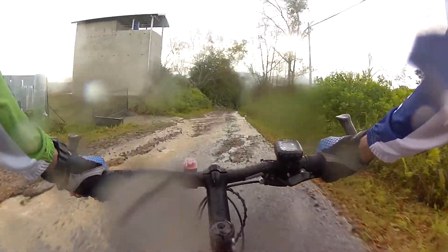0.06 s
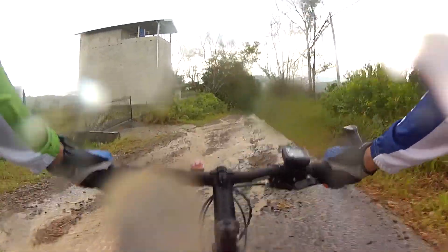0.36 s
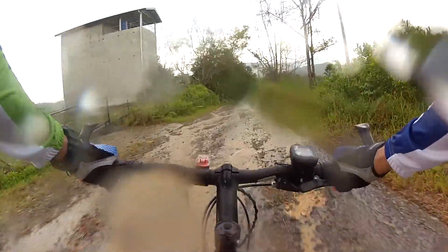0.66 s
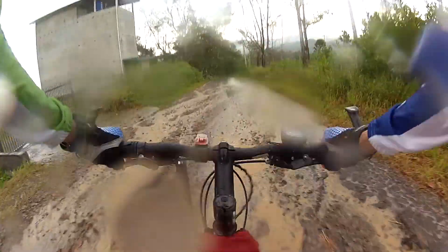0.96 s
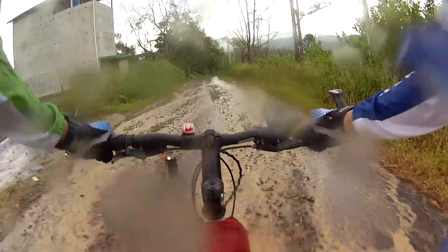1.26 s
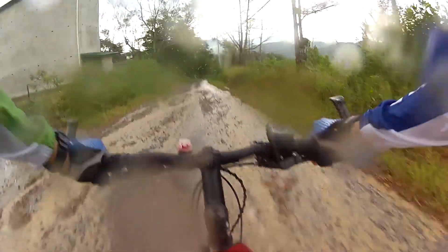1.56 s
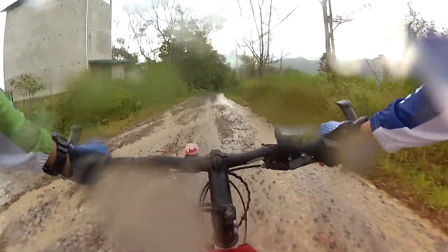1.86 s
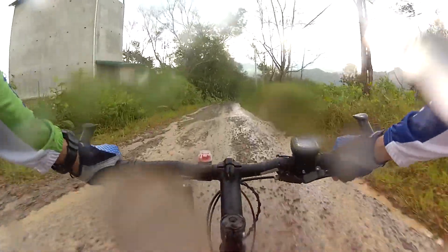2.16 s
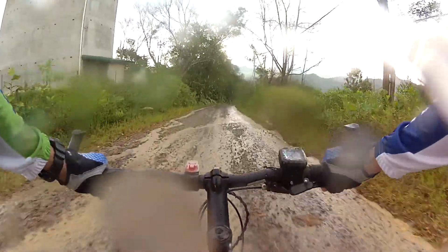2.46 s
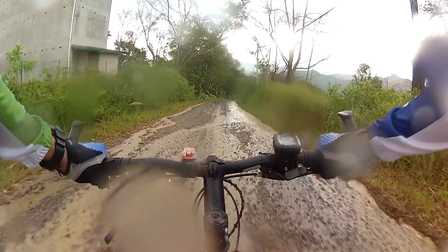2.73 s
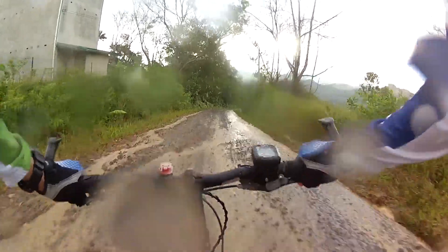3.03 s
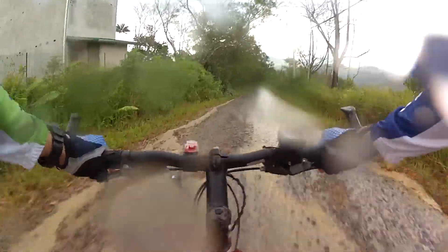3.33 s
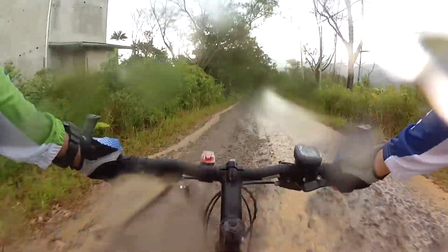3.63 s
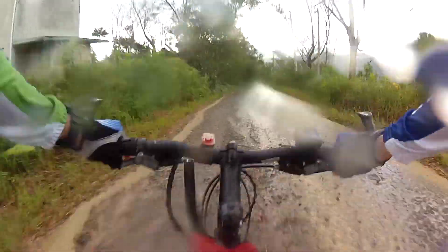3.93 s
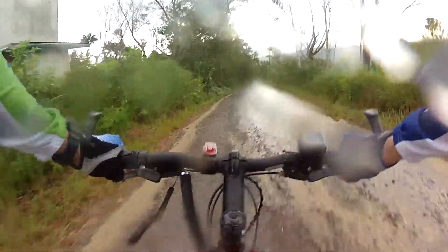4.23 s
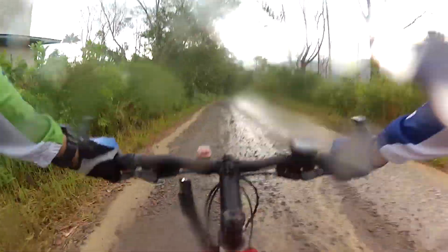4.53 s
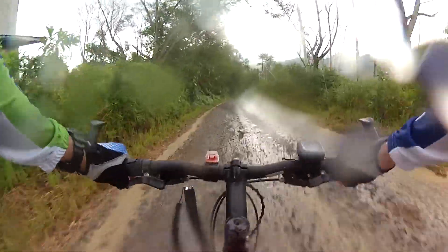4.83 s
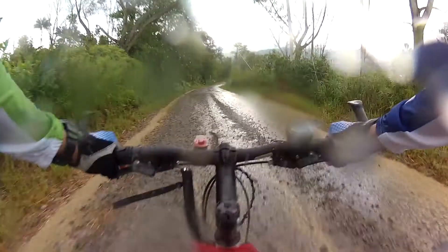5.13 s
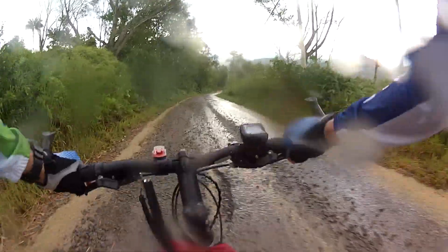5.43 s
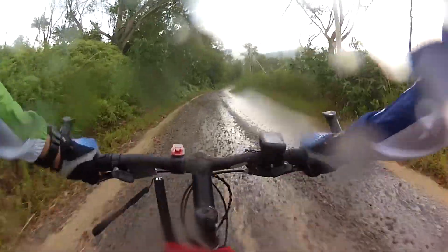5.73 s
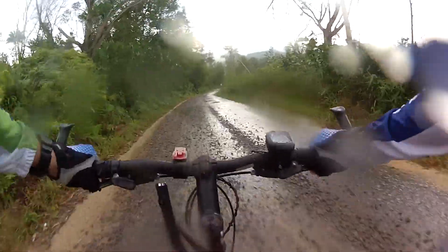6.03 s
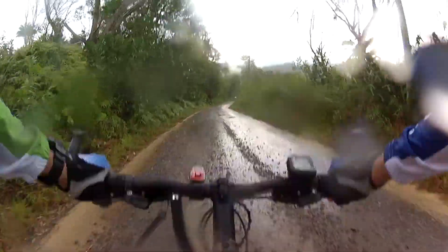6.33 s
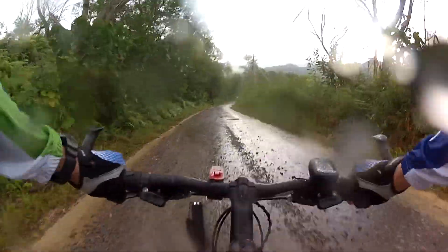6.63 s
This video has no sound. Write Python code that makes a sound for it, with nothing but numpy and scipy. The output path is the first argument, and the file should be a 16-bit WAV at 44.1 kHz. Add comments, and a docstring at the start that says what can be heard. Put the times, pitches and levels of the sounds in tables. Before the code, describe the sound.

Bicycle tyres roll along a wet, broken road for nearly seven seconds, heard close from a microphone in a plastic case on the rider's chest. A gritty spray hiss runs over an uneven low rumble, while mud drops and small stones tick irregularly on the case. The spray swells around 1 second, and a run of heavy thuds follows from about 1.3 to 1.8 seconds. At 1.6 seconds a splash and one hard jolt, the loudest moment, overload the microphone and briefly duck the sound. The rolling is quieter between 2 and 2.7 seconds. Splashes and a bump return around 3 seconds, with a flurry of clicks from 3.7 to 4. Another strong thud with splashing comes at 5 seconds, and a smaller one near 6.5. A very faint high whine flutters with the bass.

```python
"""Tyres hiss and throw grit over a low rumble: a bicycle rolling down a wet, broken road,
heard from a camera in a plastic case on the rider's chest. Mud drops and small stones tick
on the case, whose resonances colour both spray and hits, and the hiss swells at each puddle.
Bumps thud through the mount, and one hard jolt overloads the microphone and ducks the sound
for a moment. The recorder adds a faint 12 kHz whine that flutters with the bass."""
import sys
import numpy as np
from scipy import signal
from scipy.fft import rfft, irfft
from scipy.io import wavfile
from scipy.ndimage import uniform_filter1d

SR = 44100
rng = np.random.default_rng(int(sys.argv[2]) if len(sys.argv) > 2 else 0)


def generate_wav(sig):
    """Save sig (samples, or channels by samples) to the path in sys.argv[1] as 16-bit PCM at SR."""
    pcm = np.round(np.clip(np.atleast_2d(sig).T, -1, 1) * 32767).astype(np.int16)
    wavfile.write(sys.argv[1], SR, pcm)


N = 294588
TIME = np.arange(N) / SR

# Water thrown by the tyres, more with speed and wetness. Each row: time in seconds, relative level in dB.
WETNESS_CURVE = [(0.0, -54), (0.52, -54), (1.21, -45), (1.47, -40), (1.71, -46.5), (2.36, -53.5),
                 (2.75, -50.5), (2.9, -48.5), (3.18, -46.5), (3.44, -50.5), (3.64, -49.5), (3.93, -44.5),
                 (4.04, -49.5), (4.3, -49.5), (5.06, -44), (5.19, -50), (6.25, -48.5), (6.68, -46)]
# Resonances of the case and the dips between them. Each row: centre in Hz, width in Hz, gain in dB.
CASE_MODES = [(1168, 356, 5.5), (1518, 330, -7.5), (1828, 400, 9.5), (2530, 360, 10.5), (3087, 260, -6.5),
              (3410, 84, 8.5), (3836, 167, 8.5), (4844, 210, 7), (6025, 530, -23), (7110, 120, 6),
              (8256, 165, 10), (8770, 150, 14.5), (8940, 520, -11), (9430, 380, 12), (10120, 550, 8.5),
              (11800, 840, -23.5), (14570, 670, 6.5), (14380, 280, 10)]
# Tone of a hard strike, before the case colours it. Each row: frequency in Hz, gain in dB.
STRIKE_EQ = [(100, -1), (550, -16), (1000, 2.5), (1800, 3), (3200, -3), (4500, -9), (7000, -11.5),
             (10500, -9), (14500, -13.5), (16000, -29)]
# Tone of a soft, dull blow. Each row: frequency in Hz, gain in dB.
THUMP_EQ = [(60, -4), (350, -7.5), (600, -18.5), (1000, -4), (1400, -10), (2500, -23), (8000, -34.5)]


def amp(db):
    """Decibels to gain."""
    return 10 ** (np.asarray(db) / 20)


def unit_rms(x):
    """Scales to rms 1."""
    return x / np.sqrt(np.mean(x ** 2) + 1e-20)


def unit_energy(x):
    """Scales to energy 1."""
    return x / np.linalg.norm(x)


def fader(curve):
    """A dB curve as a gain for every sample."""
    return amp(np.interp(TIME, *np.transpose(curve)))


def add(mix, start_s, sound):
    """Mixes a sound in at a time."""
    part = mix[max(round(start_s * SR), 0):][:len(sound)]
    part += sound[:len(part)]


def response(eq, modes=(), size=4096):
    """Minimum-phase impulse response of an EQ curve with resonances on it."""
    hz = abs(np.fft.fftfreq(size, 1 / SR))
    points_hz, gains_db = np.transpose(eq)
    db = np.interp(np.log(hz + 1), np.log(points_hz), gains_db)
    for centre, width, height in modes:
        db += height / (1 + (2 * (hz - centre) / width) ** 2)
    log_spectrum = np.conj(signal.hilbert(np.log(amp(db))))
    return np.fft.ifft(np.exp(log_spectrum)).real[:size // 2]


def colour(x, eq, modes=()):
    """Plays a signal through an EQ curve and its resonances."""
    return signal.oaconvolve(x, response(eq, modes))[:len(x)]


def wander(rate_hz):
    """Random flutter of rms 1, faster than 5 Hz and rolling off above the given rate."""
    hz = np.fft.rfftfreq(N, 1 / SR)
    spectrum = rfft(rng.standard_normal(N)) * (hz > 5) / (1 + (hz / rate_hz) ** 2)
    return unit_rms(irfft(spectrum, N))


def grains(per_s, spread_db):
    """Random impacts of either sign: most are tiny, a few large."""
    sizes = amp(spread_db * np.minimum(rng.exponential(1, N), 4.5))
    signs = rng.choice([-1, 1], N)
    return unit_rms(sizes * signs * (rng.random(N) < per_s / SR))


def spatter(per_s, spread_db, swell_s):
    """Clumps of droplets: short bursts of noise at random moments."""
    t = np.arange(SR // 20) / SR
    bursts = signal.oaconvolve(abs(grains(per_s, spread_db)), t * np.exp(-t / swell_s))[:N]
    return unit_rms(bursts * rng.standard_normal(N))


def spurts(x, depth_db, patch_size=(5, 9)):
    """Every spurt of water has its own colour: short random patches in frequency and time."""
    frames = dict(nperseg=512, noverlap=384)
    spectra = signal.stft(x, **frames)[2]
    patches = rng.standard_normal(spectra.shape)
    for axis in (0, 1, 0, 1):
        patches = uniform_filter1d(patches, patch_size[axis], axis)
    spectra *= amp(depth_db * unit_rms(patches))
    return unit_rms(signal.istft(spectra, **frames)[1][:N])


def tyres(surge_db=0.7, drift_db=2.5):
    """Tread squeezes water into a surging hiss with grit, mud and fine mist, thickest at puddles."""
    # Tone of the spray, before the case colours it. Each row: frequency in Hz, gain in dB.
    spray_eq = [(100, -28.5), (300, 3), (420, -8.5), (700, -12), (1300, -2.5), (2200, -1), (4000, -6),
                (7000, -9), (10000, -14), (11000, -18), (15000, -17.5), (16000, -59)]
    # Airy tone of the mist. Each row: frequency in Hz, gain in dB.
    mist_eq = [(1500, -51), (3500, 12.5), (5000, 2.5), (7500, 3), (9500, -16), (12000, -82), (16000, -59)]
    hiss = amp(-1 + surge_db * wander(rate_hz=89)) * rng.standard_normal(N)
    grit = amp(-7) * grains(per_s=700, spread_db=6.5)
    mud = amp(-3.5) * spatter(per_s=55, spread_db=3.0, swell_s=0.0012)
    spray = amp(1.5) * spurts(colour(hiss + grit + mud, spray_eq, CASE_MODES), depth_db=2.0)
    fizz = rng.standard_normal(N)
    puffs = amp(17.5) * spatter(per_s=90, spread_db=7.5, swell_s=0.0021)
    mist = spurts(colour(fizz + puffs, mist_eq), depth_db=1.5)
    mist *= amp(drift_db * wander(rate_hz=6.8))
    road, sheets = fader(WETNESS_CURVE), puddles()
    return spray * np.hypot(road, sheets) + mist * np.hypot(amp(-15.5) * road, amp(-10.5) * sheets)


def mount(lumps_db=2.5, rise_s=0.0027, judder_s=0.031, sag_s=0.014):
    """The camera sways on its mount in a lumpy rumble; each bump adds a swing, a sag and a judder."""
    # The road shaking the mount. Each row: time in seconds, relative level in dB.
    shaking = [(0.0, -46.5), (1.19, -43.5), (1.49, -45.5), (1.6, -26), (1.78, -44), (2.29, -51.5),
               (3.33, -46), (4.86, -43.5), (6.31, -47), (6.68, -42)]
    # Bumps in the road. Each row: crest in seconds, level in dB, mount pitch in Hz, decay in seconds.
    bumps = [(0.927, -28.5, 102, 0.027), (1.25, -23, 116, 0.0066), (1.308, -21.5, 90.5, 0.014),
             (1.333, -15.5, 99, 0.02), (1.352, -9, 96, 0.0096), (1.445, -11.5, 109, 0.0066),
             (1.491, -13.5, 170, 0.0083), (1.519, -17.5, 113, 0.01), (1.578, -17.5, 94, 0.01),
             (1.667, -9, 115, 0.018), (1.765, -21.5, 108, 0.025), (3.158, -15, 86, 0.0059),
             (3.513, -23, 78, 0.014), (3.882, -25.5, 118.6, 0.023), (4.323, -24.5, 116, 0.018),
             (4.355, -24, 111, 0.043), (4.848, -22.5, 83, 0.0076), (4.959, -26.5, 110, 0.011),
             (4.985, -8.5, 109, 0.0097), (5.003, -13, 90, 0.017), (5.342, -28, 93, 0.014),
             (5.725, -22, 85.5, 0.0083), (6.455, -15.5, 88.5, 0.013), (6.601, -20, 84, 0.012)]
    thuds, judder = np.zeros(N), np.zeros(N)
    t = np.arange(-SR // 8, SR // 4) / SR
    for crest_s, db, hz, decay_s in bumps:
        # The envelope is down to a third at rise_s before the crest and decay_s after it.
        swing = -np.cos(2 * np.pi * hz * t) / np.cosh(1.75 * t / np.where(t < 0, rise_s, decay_s))
        sag = amp(-22) * (t / sag_s - 1) * np.exp(-(t / sag_s - 1) ** 2)
        add(thuds, crest_s + t[0], amp(db) * (swing + sag))
        add(judder, crest_s + t[0], amp(db - 23.5) * np.exp(-(t / judder_s) ** 2))
    # Deep tone of the swaying mount. Each row: frequency in Hz, gain in dB.
    rumble_eq = [(10, -0.5), (25, 5), (60, -5), (110, 3.5), (170, -4), (230, -9.5), (320, -15.5),
                 (500, -22.5), (1000, -27.5), (3000, -106)]
    rumble = colour(rng.standard_normal(N), rumble_eq)
    rumble = unit_rms(rumble * amp(lumps_db * wander(rate_hz=5.7)))
    return thuds + rumble * np.hypot(amp(3.5) * fader(shaking), judder)


def recorder_whine(bass, pitch_hz=12000):
    """The recorder images the bass high in the treble: a faint whine that flutters with it."""
    return amp(-33.5) * bass * np.sin(2 * np.pi * pitch_hz * TIME)


def contact(splash_db, rebound=0.5, rebound_s=0.003, swell_s=0.0015, splash_s=0.0094, size=2048):
    """A blow and three rebounds, with a brief noise swell softening the attack and a splashy tail."""
    t = (np.arange(size) - size // 2) / SR
    noise = rng.standard_normal(size) * np.exp(-abs(t) / np.where(t < 0, swell_s, splash_s))
    force = amp(splash_db) * unit_energy(noise)
    force[size // 2] += 1
    for delay, strength in rng.uniform(0.24, 1, (3, 2)):
        add(force, delay * rebound_s - t[0], np.array([rebound * strength]))
    return t[0], force


def hit(time_s, db, hardness, splash_db, ring_hz, thump_below=0.3, blend=0.03, lag_s=0.001):
    """Hard grit cracks on the case, soft mud thumps; each spot that is hit rings at its own pitch."""
    offset_s, force = contact(splash_db)
    spot = (ring_hz, 320, 7.0)
    # A harder hit has more treble snap and less body.
    snap = (6330, 9000, 35 * (hardness - 0.57))
    body = (900, 810, 6 * (0.42 - hardness))
    presence = (3190, 290, 6.2)
    crack = amp(13) * unit_energy(colour(force, STRIKE_EQ, CASE_MODES + [spot, snap, body, presence]))
    thump = amp(17) * unit_energy(colour(force, THUMP_EQ, [spot]))
    softness = 0.5 + 0.5 * np.tanh((thump_below - hardness) / blend)
    return time_s + lag_s + offset_s, amp(db) * ((1 - softness) * crack + softness * thump)


def drops_and_stones(small_per_s=6, softest=0.3, low_hz=1160, high_hz=2560, usual_wet_db=-48):
    """Drops and stones tick on the case: big ones, and a small scatter that grows with the spray."""
    # The loudest hits. Each row: time in seconds, relative strength in dB, hardness from 0 (mud)
    # to 1 (sharp grit), splash against the blow in dB, ring of the spot in Hz.
    big_hits = [(0.125, -16, 0.92, -27, 2170), (0.196, -23.5, 0.67, 7, 2100), (0.461, -21, 0.65, -5, 1110),
                (0.688, -25.5, 0.33, 4, 1160), (0.697, -21, 0.3, -2, 1170), (0.728, -15.5, 0.43, -7, 1600),
                (0.886, -24, 0.31, -2, 1780), (0.936, -21, 0.53, -6, 1950), (1.013, -22, 0.98, -1, 2650),
                (1.044, -21.5, 0.54, -9, 1930), (1.049, -16.5, 0.35, -12, 2720),
                (1.07, -17.5, 0.99, -23, 2560), (1.123, -17, 0.32, -22, 1630),
                (1.149, -21, 0.94, -17, 1940), (1.461, -19, 0.99, -10, 2790), (1.573, -19, 0.3, 3, 1760),
                (1.657, -23, 0, 16, 1130), (1.697, -18, 0.31, 2, 1210), (1.818, -24, 0.78, -12, 1710),
                (1.964, -32, .2, 2, 1190), (2.065, -14, .42, -22, 1840), (2.304, -29.5, 0.8, -19, 1930),
                (2.86, -24.5, 0.37, -19, 1350), (3.116, -27.5, 0.28, 8, 1150),
                (3.139, -17.5, 0.83, -4, 1740), (3.277, -18.5, 0.48, -8, 1610),
                (3.339, -22.5, 0.33, -13, 1780), (3.357, -22, 0.31, -6, 1730),
                (3.699, -17.5, 0.28, -12, 1150), (3.769, -24, 0.31, -4, 1290),
                (3.836, -14, 0.34, -27, 1630), (3.886, -14.5, 0.52, -1, 2350), (3.948, -20.5, 1, 10, 1890),
                (3.974, -17.5, 0.315, -3, 1840), (3.977, -15.5, 0.31, 2.5, 1700),
                (4.003, -24, 0.58, -5, 2400), (4.018, -25, .3, -6, 2050), (4.285, -24, 0.74, 10, 2540),
                (4.448, -25, 1, 6, 1940), (4.741, -22, 1, -9, 2020), (4.815, -23.5, 0.74, 4, 2030),
                (4.98, -18, 0, -28, 970), (5.15, -23, 0.23, -5, 1960), (5.182, -20.5, 0.72, 7, 2530),
                (5.202, -11.5, 0.54, -8, 1560), (5.232, -25.5, 0.31, -11, 1800), (5.497, -24, 0.3, 3, 1150),
                (5.561, -16.5, 0.39, -1, 1960), (5.819, -24, 0.82, 9, 1650), (5.824, -16, 0.64, -4, 1600),
                (6.058, -24.5, 0.63, -13, 2040), (6.466, -22, 0.67, -0.5, 1770)]
    big, small = np.zeros(N), np.zeros(N)
    for row in big_hits:
        add(big, *hit(*row))
    for when, size, grit, spot in rng.random((round(small_per_s * N / SR), 4)):
        db = -33 + 4.5 * (2 * size - 1)
        hardness = softest + grit * (1 - softest)
        ring_hz = low_hz + spot * (high_hz - low_hz)
        add(small, *hit(when * N / SR, db, hardness, splash_db=-7, ring_hz=ring_hz))
    return big + small * np.sqrt(fader(WETNESS_CURVE) / amp(usual_wet_db))


def puddles(trim_db=-11.5, swell_s=0.0018):
    """Envelope of the sheets of water thrown up at puddles: each swells quickly and drains away."""
    # Tyres slapping through puddles. Each row: start in seconds, relative level in dB, length in seconds.
    splashes = [(0.196, -37.5, 0.073), (1.01, -36.5, 0.34), (1.297, -34, 0.044), (1.558, -26, 0.075),
                (2.719, -32, 0.022), (3.045, -36.5, 0.13), (3.702, -31.5, 0.05), (4.048, -32.5, 0.048),
                (4.986, -27, 0.062), (5.125, -28.5, 0.12), (5.368, -37.5, 0.089), (5.639, -31.5, 0.029),
                (6.438, -33, 0.15)]
    sheets = np.zeros(N)
    t = np.arange(SR // 4) / SR
    for start_s, db, length_s in splashes:
        envelope = (1 - np.exp(-t / swell_s)) * np.exp(-(t / length_s) ** 2)
        add(sheets, start_s, amp(db + trim_db) * envelope)
    return sheets


def jolt(time_s=1.6062, push_hz=80, push_s=0.0052, pressed_s=0.0047, ring_s=0.0055):
    """A pothole throws the camera up and back; the case touches its stop, then clacks on the reversal."""
    # Ring of the case against its stop. Each row: pitch in Hz, relative level in dB.
    stop_modes = [(640, -21), (950, -17), (1265, -8.5), (1755, -1)]
    t = TIME - time_s
    thud = -amp(7) * np.sin(2 * np.pi * push_hz * t) * np.exp(-(t / push_s) ** 2)
    touch = response(THUMP_EQ)
    add(thud, time_s - 0.005, -amp(-8) * touch / abs(touch).max())
    clack_age = np.maximum(t + 0.0012, 0)
    pressed = (clack_age > 0) * np.exp(-(clack_age / pressed_s) ** 6)
    partials = sum(amp(db + 1) * np.sin(2 * np.pi * hz * clack_age) for hz, db in stop_modes)
    clack = -partials * np.exp(-clack_age / ring_s)
    brightness = [(3800, 950, -16), (6000, 1500, 16.5), (10300, 500, 4.5), (12800, 430, 19)]
    chatter = unit_rms(colour(rng.standard_normal(N), STRIKE_EQ, CASE_MODES + brightness))
    return thud + pressed * (clack + amp(-6) * chatter)


def scene():
    """The ride in mono: spray, ticks, the swaying mount, a faint recorder whine and the pothole."""
    bass = mount()
    return (tyres() + drops_and_stones() + bass + recorder_whine(bass) + jolt())[None]


def record(dry, threshold_db=-12.0, slope=1.38, release_db_per_s=95, react_s=0.0103, cutoff_hz=16000):
    """The jolt overloads the microphone; a late gain control ducks and recovers, then a low-pass."""
    clipped = np.clip(dry[0], -1, 1)
    power_db = 10 * np.log10(abs(uniform_filter1d(clipped ** 2, size=256)) + 1e-12)
    # The detector holds each peak and lets it fall at a steady rate.
    fall_db = TIME * release_db_per_s
    held_db = np.maximum.accumulate(power_db + fall_db) - fall_db
    over_db = uniform_filter1d(np.maximum(held_db - threshold_db, 0), size=128)
    duck_db = slope * np.interp(TIME - react_s, TIME, over_db)
    low_pass = signal.firwin(255, cutoff_hz, window=("kaiser", 9), fs=SR)
    return signal.oaconvolve(clipped * amp(-duck_db), low_pass, "same")[None]


dry = scene()
out = record(dry)
generate_wav(out)
```